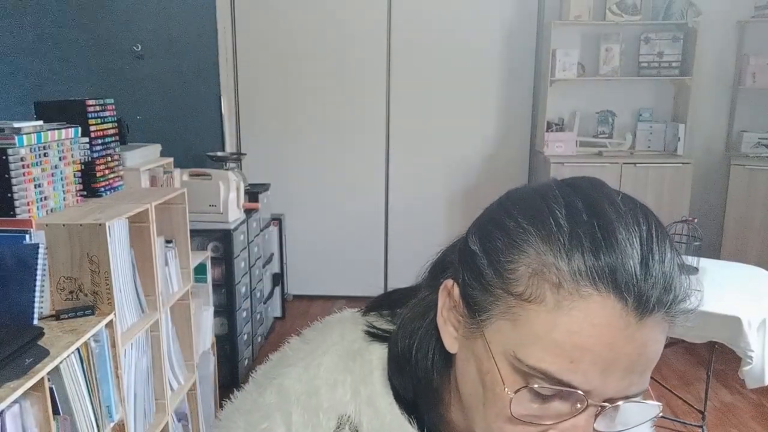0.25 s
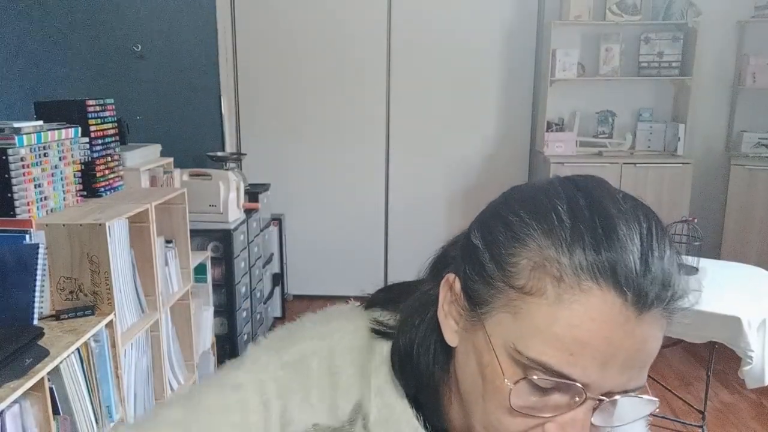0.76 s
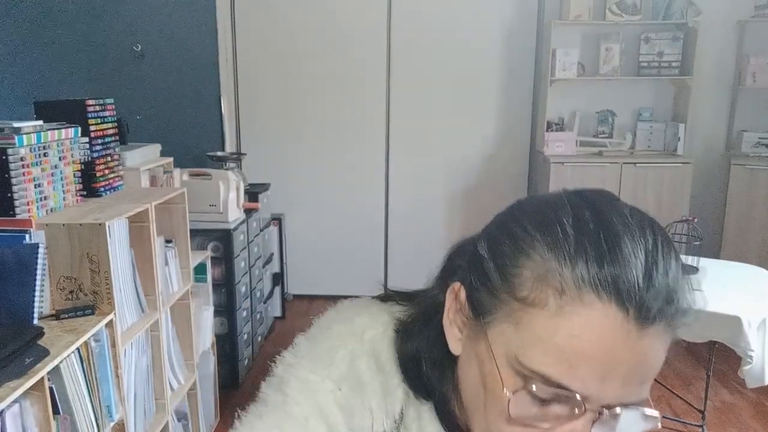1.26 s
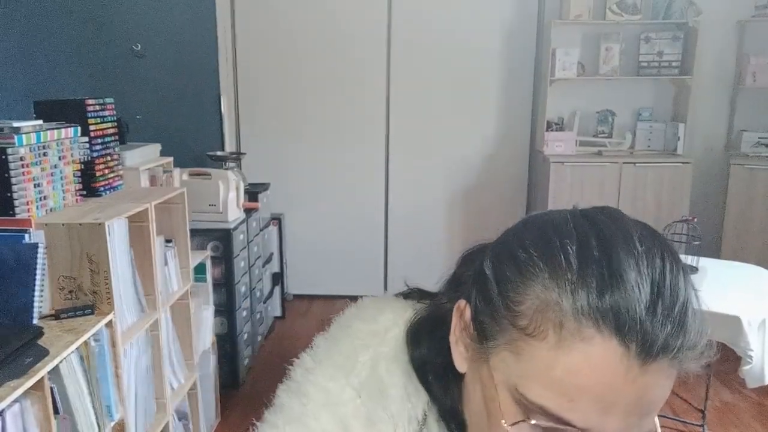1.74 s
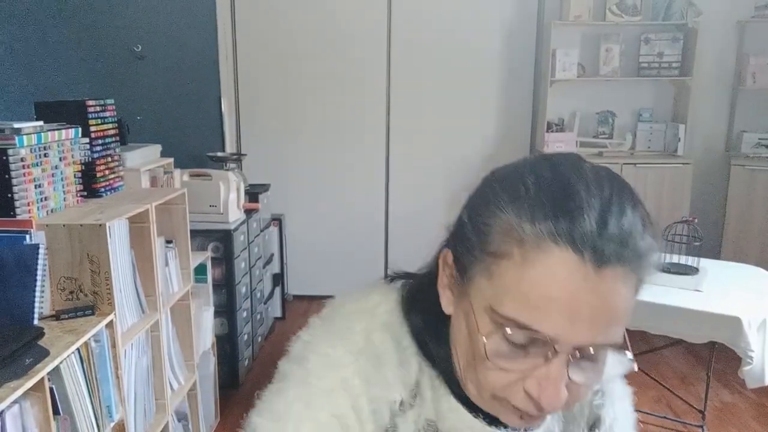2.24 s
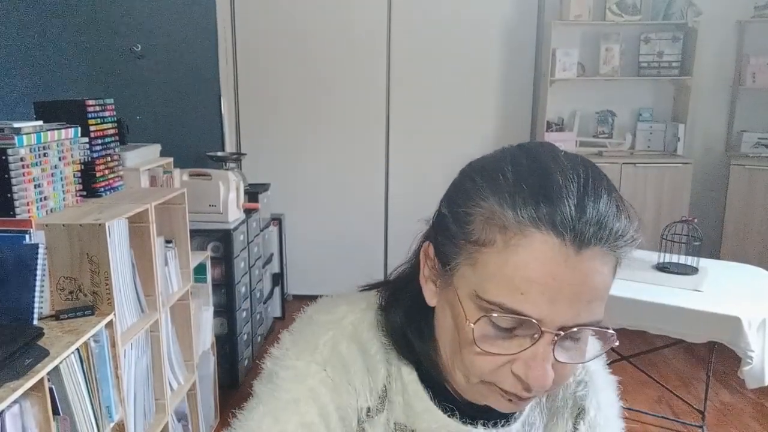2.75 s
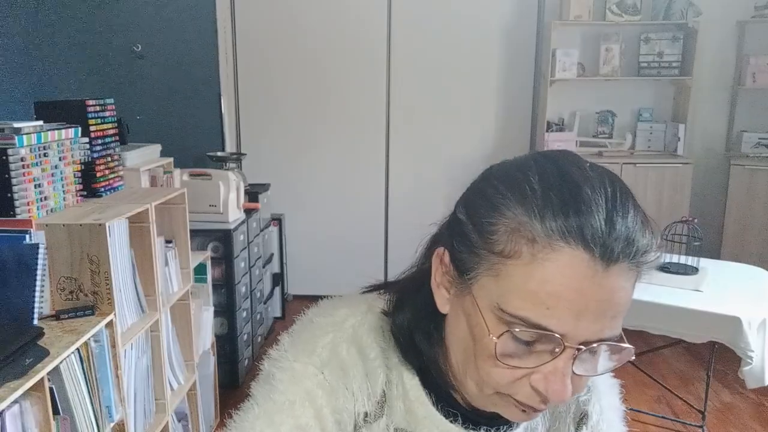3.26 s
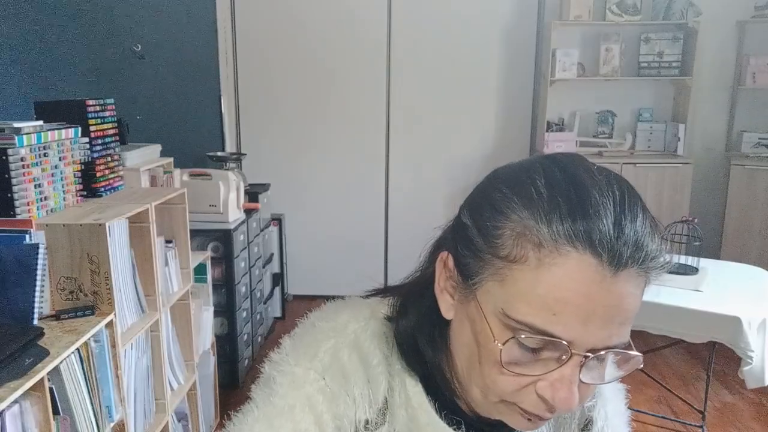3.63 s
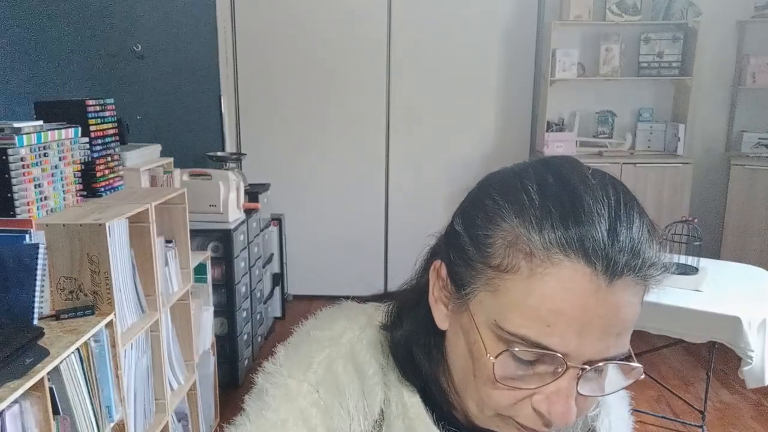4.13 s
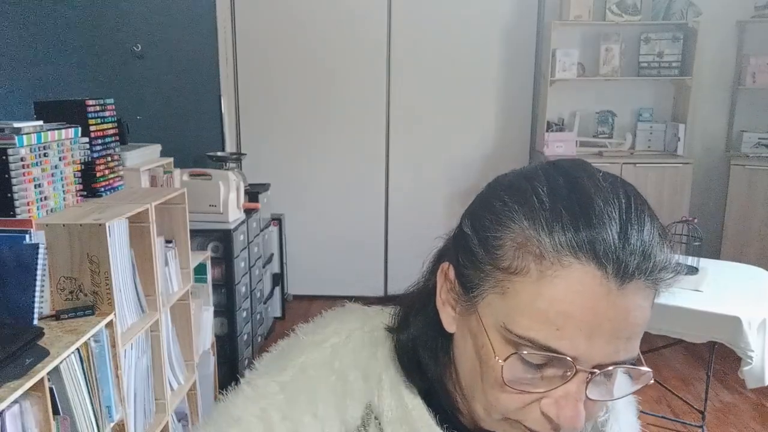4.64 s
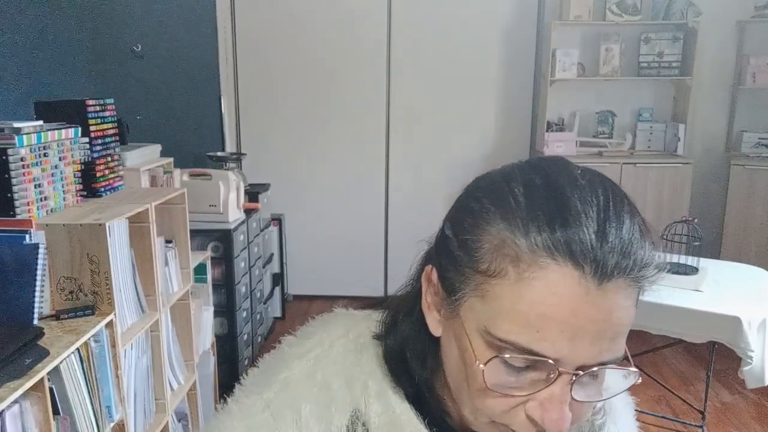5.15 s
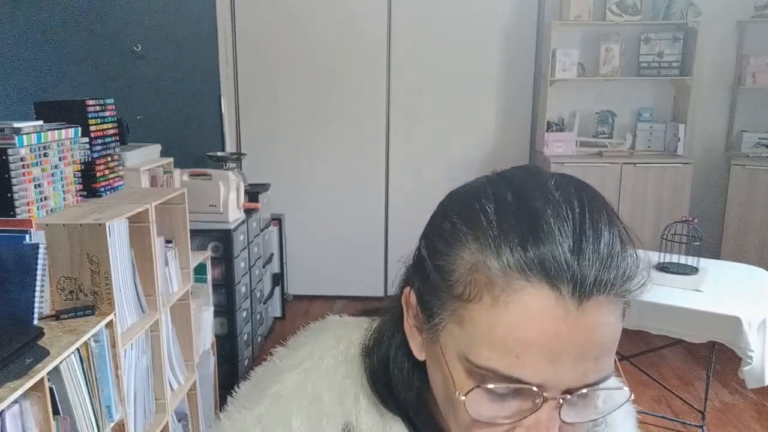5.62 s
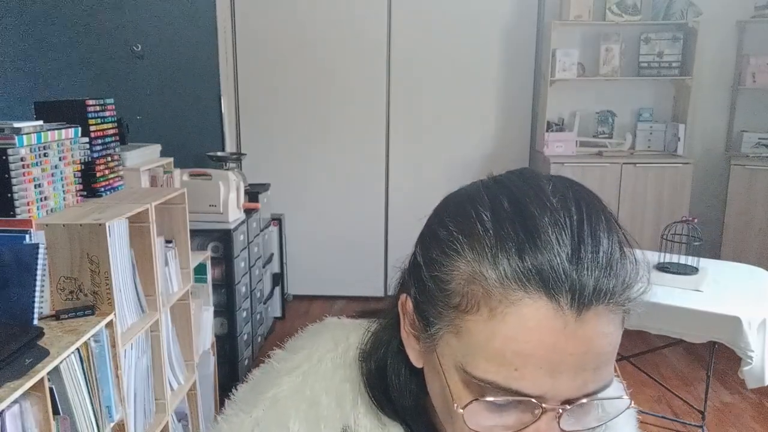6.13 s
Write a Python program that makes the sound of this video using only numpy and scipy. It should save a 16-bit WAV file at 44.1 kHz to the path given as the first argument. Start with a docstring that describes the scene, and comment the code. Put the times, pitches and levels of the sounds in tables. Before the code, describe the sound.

A low, soft room rumble runs throughout, heard close from a table in a small room. From 0.15 to 0.55 s card slides faintly with a thin bright hiss, a tick and a low scrape. At 1.1 s a lever punch starts down with light clicks, quickening around 1.2-1.5 s; at 1.5 s the die snaps through with a sharp crack and slight high ring. A strong knock at 1.71 s leads to the loudest, woody clunk at 1.76 s, the table resonating briefly. Near 2.1-2.3 s come scrapes and small clicks, then at 2.37 s the lever springs back with a bright clack and short metallic ring. From 2.5 to 3.6 s card rustles, hollow scuffs and ticks, clearest at 3.0 and 3.3 s. The rest is sparse: faint papery rubs, tiny ticks, soft dull bumps at 4.65 and 5.7 s, and last slides past 6 s.

```python
"""Over a low room rumble, card slides, ticks and hisses along a guide while a lever punch is dragged on a table.
From 1.1 s the lever is pushed down in steps; the die snaps through at 1.5 s and the hardest blow lands at 1.76 s.
At 2.37 s the spring throws the lever back; then come scuffs, card slides, ticks and, from 4.6 s, dull bumps.
Blows sum table modes, housing modes and coloured crunches; rubs are gated noise; the small room is decaying noise.
Two microphones on the table hear it all."""
import sys
import numpy as np
from scipy import signal
from scipy.fft import rfft, irfft
from scipy.io import wavfile
from scipy.ndimage import uniform_filter1d

SR = 44100
rng = np.random.default_rng(int(sys.argv[2]) if len(sys.argv) > 2 else 0)


def master(y):
    """Save y as 16-bit WAV."""
    cut = np.clip(np.atleast_2d(y).T, -1, 1)
    pcm = np.round(cut * 32767)  # scale
    wavfile.write(sys.argv[1], SR, pcm.astype(np.int16))


N = 281358
TIME = np.arange(N) / SR
BURST = np.arange(int(.8 * SR)) / SR  # time axis of one short event, s

# Knocks and blows of the punch. Each row: start in seconds, table thump in dB, housing clack in dB,
# blade crack in dB, contact fade in seconds, favoured housing pitch in Hz.
BLOWS = [(0.523, -58, -82, -80, 0.0053, 2050), (1.096, -53, -78, -78.5, .004, 1120),
         (1.115, -53, -79, -71.5, 0.0092, 1680), (1.22, -60, -54.5, -58.5, 0.004, 1120),
         (1.237, -50.5, -65.5, -67.5, .004, 1680), (1.279, -49, -51, -60.5, 0.0059, 1250),
         (1.332, -54.5, -64, -58.5, 0.012, 2050), (1.433, -59, -69, -60, 0.011, 1680),
         (1.485, -55, -69, -54.5, 0.024, 2050), (1.504, -33.5, -43, -40.5, 0.0038, 4800),
         (1.673, -58, -75.5, -55.5, 0.0086, 4800), (1.7141, -36, -44, -43, 0.0082, 2050),
         (1.758, -26, -30.5, -28, 0.0044, 1500), (1.769, -46.5, -43.5, -42.5, 0.0017, 2050),
         (2.234, -50, -67, -64.5, 0.0062, 1680), (2.264, -50.5, -59.5, -71, 0.0016, 1680),
         (2.286, -45.5, -62, -53, 0.022, 2050), (2.339, -47, -52.5, -55, 0.0041, 3150),
         (2.369, -43, -53, -41, 0.0016, 1120), (2.373, -33, -36.5, -36, 0.0023, 1680)]


def undb(db):
    """Decibels to gain."""
    return 10 ** (np.asarray(db) / 20)


def on_log_axis(hz, points):
    """Read (Hz, value) points along log frequency."""
    at, value = np.transpose(points)
    return np.interp(np.log(hz + 1), np.log(at), value)


def convolve(x, response):
    """Pass a sound through a response, keeping its length."""
    size = x.shape[-1]
    return signal.fftconvolve(np.atleast_2d(x), np.atleast_2d(response)[:, :size], axes=1)[:, :size]


def colour(x, points, size=8192):
    """Minimum-phase filter with the given spectrum, by folding the cepstrum."""
    gain = undb(on_log_axis(np.fft.rfftfreq(size, 1 / SR), points))
    cepstrum = irfft(np.log(gain))
    cepstrum[1:size // 2] *= 2
    cepstrum[size // 2 + 1:] = 0
    return convolve(x, irfft(np.exp(rfft(cepstrum))))


def steady(x):
    """Scale to rms 1."""
    return x / np.sqrt(np.mean(x ** 2))


def blow(x):
    """Scale to the energy of 10 ms at rms 1."""
    energy = np.mean(np.sum(x ** 2, axis=-1))
    return x / np.sqrt(energy / (SR / 100))


def add(out, s, sound):
    """Mix a sound in at a time."""
    start = int(s * SR)
    out[:, start:start + sound.shape[-1]] += sound[..., :N - start]


def pair_noise(size, spacing_m, match=0.81):
    """Noise from all around at two spaced microphones: most alike in the bass, unrelated in the treble."""
    alike = match * np.sinc(2 * np.fft.rfftfreq(size, 1 / SR) * spacing_m / 343)  # 343 m/s: sound in air
    mid = irfft(rfft(rng.standard_normal(size)) * np.sqrt(1 + alike), size)
    side = irfft(rfft(rng.standard_normal(size)) * np.sqrt(1 - alike), size)
    return np.array([mid + side, mid - side]) / np.sqrt(2)


def ring(modes, size=None):
    """Impulse response of damped modes given as (Hz, dB, t60 s)."""
    t = BURST[:size]
    return sum(undb(db - 60 * t / t60) * np.sin(2 * np.pi * hz * t) for hz, db, t60 in modes)


def contact(fade_s, spacing_m, size=2048):
    """A brief crunch of tiny contacts with an even spectrum: it starts at once and dies away."""
    fade = np.exp(-BURST[:size] / max(fade_s, 1e-4))
    crunch = rfft(pair_noise(size, spacing_m) * fade)
    power = uniform_filter1d(np.mean(abs(crunch) ** 2, axis=0), size=20)
    even = irfft(crunch / np.sqrt(power))
    return even * fade ** .1  # tames the late residue of the flattening


def friction(spectrum, grip_db, slips_per_s):
    """Rubbing noise that swells and sinks as the surfaces grip and slip."""
    grip = np.interp(TIME * slips_per_s, np.arange(N), rng.standard_normal(N))
    rub = pair_noise(N, spacing_m=0.082) * undb(grip_db * grip)
    return steady(colour(rub, spectrum))


def swells(rows):
    """Gain over time from (s, dB, half length s) bell-shaped strokes."""
    return sum(undb(db) * np.exp(-((TIME - s) / half_s) ** 2 / 2) for s, db, half_s in rows)


def strokes(rows, attack_s, swell_db, release_s):
    """Gain over time of hand strokes: each takes hold, swells while it lasts and dies away."""
    gain = np.zeros(N)
    for start_s, length_s, db in rows:
        age = TIME - start_s
        attack = np.clip(age / attack_s, 0, 1)
        hold = undb(db + swell_db * (np.clip(age / length_s, 0, 1) - 1))
        release = np.exp(-np.maximum(age - length_s, 0) / release_s)
        gain += attack * hold * release
    return gain


def room_rumble(level_db):
    """Steady low noise from all around the room."""
    # Each row: frequency in Hz, level in dB per Hz.
    rumble_spectrum = [(20, -9), (40, -5), (70, -12), (115, 0.5), (190, -5), (300, -9.5), (480, -19.5),
                       (800, -24.5), (1500, -29), (3000, -32), (8000, -38), (16000, -32.5)]
    return undb(level_db) * steady(colour(pair_noise(N, spacing_m=0.25), rumble_spectrum))


def room(x, build_s=.005):
    """Dense reflections of the first channel build up in milliseconds; each octave dies at its own rate."""
    # Decay of the room. Each row: frequency in Hz, t60 in seconds.
    room_decay = [(100, 0.46), (400, 0.7), (1500, 0.3), (5000, 0.51), (9000, 0.29), (15000, 0.4)]
    field = rfft(pair_noise(len(BURST), spacing_m=0.14))
    octave = np.log2(np.clip(np.fft.rfftfreq(len(BURST), 1 / SR), 125, 16000) / 125)
    tail = 0
    for k in range(8):  # overlapping octaves, 125 Hz to 16 kHz
        band = irfft(field * np.maximum(1 - abs(octave - k), 0), len(BURST))
        t60_s = on_log_axis(125 * 2 ** k, room_decay)
        tail = tail + band * undb(-60 * BURST / t60_s)
    tail = tail * (1 - np.exp(-(BURST / build_s) ** 2))
    return convolve(x[0], tail / np.sqrt(np.sum(tail ** 2) / 2))


def bumps(direct_db=-5, room_db=-1, attack_s=0.0035, fade_s=0.021):
    """Padded contacts that rise softly and leave a short wash in the room."""
    # Each row: start in seconds, level in dB.
    bump_rows = [(4.646, -60.5), (4.666, -64), (5.712, -62), (5.789, -69.5)]
    # Each row: frequency in Hz, level in dB per Hz.
    bump_spectrum = [(100, -5), (300, 7), (550, 0), (900, 0), (1600, 2.5), (2600, -3.5), (3500, -12.5),
                     (6000, -18), (16000, -47)]
    gain = np.zeros(N)
    for s, db in bump_rows:
        age = np.maximum(TIME - s, 0)
        gain += undb(db) * np.minimum(age / attack_s, 1) * np.exp(-age / fade_s)
    thud = gain * friction(bump_spectrum, grip_db=2, slips_per_s=120)
    return undb(direct_db) * thud + undb(room_db) * room(thud)


def card(face_db=-2):
    """The card's face rubs with a papery rustle; its cut edge adds a thin hiss."""
    # Pushes along the guide. Each row: start in seconds, length in seconds, level in dB.
    slides = [(.145, 0.021, -71.5), (.275, 0.19, -70.5), (.42, 0.086, -71.5), (1.165, .03, -67),
              (1.22, 0.31, -68), (1.52, 0.11, -69), (1.63, 0.049, -57), (2.27, 0.062, -53),
              (2.5, 0.097, -63), (2.615, 0.089, -60.5), (2.72, 0.15, -62), (3.13, .17, -68.5),
              (3.3, 0.07, -56.5), (3.42, 0.19, -72.5), (4.075, .04, -69), (4.14, .15, -76.5),
              (4.52, 0.14, -73), (4.865, 0.084, -71), (5.03, 0.16, -75), (5.265, 0.063, -71),
              (5.385, 0.23, -67), (5.68, .23, -74), (5.97, .11, -72.5), (6.09, 0.059, -65),
              (6.24, 0.065, -72)]
    # The cut edge skims the guide. Each row: centre in seconds, level in dB, half length in seconds.
    skims = [(.315, -63, 0.031), (.41, -60, 0.032), (.465, -64.5, 0.042), (.515, -69, 0.018),
             (4.855, -64.5, 0.015), (5.065, -65.5, 0.023), (5.15, -66.5, 0.016), (5.29, -67.5, .016)]
    # Spectra of face and edge. Each row: frequency in Hz, level in dB per Hz.
    face_spectrum = [(200, -17.5), (700, -9), (1300, -6.5), (1900, 1.5), (2300, 5), (2900, -2.5),
                     (4200, -3.5), (6500, -5.5), (9000, -3.5), (12000, -1.5), (16000, -7.5)]
    edge_spectrum = [(200, -36), (2000, -14), (4000, -8.5), (7500, -12), (9500, -7.5), (11000, -3.5),
                     (12500, 0), (16000, -11)]
    push = strokes(slides, attack_s=0.012, swell_db=2, release_s=0.014)
    face = push * friction(face_spectrum, grip_db=2, slips_per_s=400)
    edge = swells(skims) * friction(edge_spectrum, grip_db=4, slips_per_s=750)
    return undb(face_db) * face + edge


def ticks():
    """The card's edge catches and flicks free with one short resonance."""
    # Each row: start in seconds, level in dB, ring in Hz, ring width in Hz, contact fade in seconds.
    tick_rows = [(.427, -61.5, 8920, 7000, 0.0027), (0.515, -62.5, 2230, 110, 0.0065),
                 (2.9904, -53.5, 3400, 930, 0.0011), (3.004, -56.5, 2000, 1500, 0.0051),
                 (3.493, -70.5, 1740, 500, 0.0054), (3.582, -74.5, 6000, 8000, 0.0058),
                 (4.096, -71, 3600, 895, 0.00061), (4.102, -65, 1470, 497, 0.007),
                 (4.193, -71, 1420, 594, 0.0025), (4.278, -72.5, 1447, 694, 0.0029),
                 (4.825, -62.5, 6030, 1800, 0.0011)]
    out = np.zeros((2, N))
    for s, db, hz, width_hz, fade_s in tick_rows:
        b, a = signal.iirpeak(hz, hz / width_hz, fs=SR)
        flick = signal.lfilter(b, a, contact(fade_s, spacing_m=0.0257))
        add(out, s, undb(db) * blow(flick))
    return out


def drags():
    """The punch drags on the table under the hand: low scraping noise."""
    # Each row: start in seconds, length in seconds, level in dB.
    drag_rows = [(.28, 0.046, -66), (.41, 0.057, -63), (.505, 0.044, -63), (1.09, 0.037, -58.5),
                 (1.19, 0.16, -56), (1.38, .32, -61.5), (2.05, 0.077, -57.5), (2.24, .22, -51),
                 (2.62, .09, -59.5), (2.95, 0.054, -59.5), (3.04, 0.31, -67), (3.35, 0.051, -60.5)]
    # Each row: frequency in Hz, level in dB per Hz.
    scrape_spectrum = [(30, -18), (70, -11.5), (110, 2.5), (250, -3), (400, -11), (650, -20), (950, -21),
                       (1500, -27.5), (4000, -39), (16000, -56.5)]
    pull = strokes(drag_rows, attack_s=0.022, swell_db=1, release_s=0.029)
    return pull * friction(scrape_spectrum, grip_db=3.5, slips_per_s=69)


def scuffs():
    """Short hollow rubs of the punch's base over the mat."""
    # Each row: centre in seconds, level in dB, half length in seconds.
    scuff_rows = [(2.092, -60.5, 0.02), (2.201, -64.5, 0.029), (2.64, -66, 0.02), (2.828, -58.5, 0.038),
                  (2.969, -63, 0.023), (3.093, -69.5, 0.037)]
    # Each row: frequency in Hz, level in dB per Hz.
    scuff_spectrum = [(100, -13.5), (250, 6), (450, 0.5), (650, -8), (950, -4.5), (1350, -19), (4000, -28),
                      (16000, -34)]
    return swells(scuff_rows) * friction(scuff_spectrum, grip_db=1.5, slips_per_s=83)


def steel(room_db=-6):
    """The die rings as it meets the card, the return spring as it throws the lever back."""
    # Each row: frequency in Hz, level in dB, t60 in seconds.
    die_modes = [(4586, 0.5, .25), (4829, 2, 0.11)]
    spring_modes = [(1744, -5.5, .4), (1770, 3.5, .38), (2315, -6.5, 0.28)]
    out = np.zeros((1, N))
    add(out, 1.504, undb(-53.5) * blow(ring(die_modes)))
    add(out, 2.373, undb(-43.5) * blow(ring(spring_modes)))
    return out + undb(room_db) * room(out)


def thumps(push_s=0.0018, dent_hz=185, dent_t60_s=0.0097, lag_s=0.00022, cushion=0.38, firm_db=-30):
    """The table top gives way under each blow, then rings on in its modes; returns (dents, ringing)."""
    # Modes of the table top. Each row: frequency in Hz, level in dB, t60 in seconds.
    table_modes = [(104.35, -6.5, 0.52), (135, -17, 0.1), (171.3, -12.5, 0.25), (216, -16.5, 0.1),
                   (244.9, -4.5, .12), (333.5, -4.5, 0.13), (481, -16, 0.34), (595, -10.5, .1),
                   (680, -9, 0.21)]
    dents = np.zeros((1, N))
    ringing = np.zeros((2, N))
    push = np.sin(np.pi * np.minimum(BURST / push_s, 1))
    dent = -blow(convolve(push, ring([(dent_hz, 0, dent_t60_s)])))
    top = -blow(convolve(push, ring(table_modes)))[0]
    # the ringing reaches the left microphone first
    top = np.array([top, np.interp(BURST - lag_s, BURST, top)])
    for s, thump_db, *_ in BLOWS:
        # the punch's feet cushion the first jolt of light blows; blows above firm_db dent harder
        add(dents, s, undb(thump_db + cushion * (thump_db - firm_db)) * dent)
        add(ringing, s, undb(thump_db) * top)
    return dents, ringing


def punch(favour_db=7, favour_octaves=0.13):
    """Each blow rings the housing and cracks at the blade, as radiated in one direction."""
    # Modes of the plastic housing. Each row: frequency in Hz, level in dB, t60 in seconds.
    housing_modes = [(1144, -6, .03), (1470, -5.5, 0.0046), (1737, 2, 0.014), (2020, 3.5, 0.011),
                     (3280, -2.5, 0.007), (4620, -3, 0.0071)]
    # Blade crack. Each row: frequency in Hz, level in dB per Hz.
    crack_spectrum = [(150, -11), (500, 2), (650, 3), (820, -1), (1400, 5), (2500, 5), (5000, 2.5),
                      (8000, 5), (16000, 0.5)]
    out = np.zeros((2, N))
    hz, db, t60_s = np.transpose(housing_modes)
    for s, _, clack_db, crack_db, fade_s, favoured_hz in BLOWS:
        # the place of contact decides which modes speak most
        favour = favour_db * np.exp(-(np.log2(hz / favoured_hz) / favour_octaves) ** 2)
        housing = ring(zip(hz, db + favour, t60_s), size=2048)
        clack = convolve(contact(fade_s, spacing_m=0.0064), housing)
        crack = colour(contact(fade_s, spacing_m=0.024), crack_spectrum, size=1024)
        add(out, s, undb(clack_db) * blow(clack))
        add(out, s, undb(crack_db) * blow(crack))
    return out


def punch_echo(count=3):
    """The punch sends different clatters towards the walls: independent crunches, each with its own tail."""
    return sum(room(punch()) for _ in range(count)) / np.sqrt(count)


def scene(dent_db=-5, thump_room_db=-3, clatter_room_db=-2, tick_room_db=-10, card_room_db=-4,
          drag_db=-1, bump_db=4, rumble_db=-66):
    """Punch, card and table in the room, over its rumble."""
    dents, ringing = thumps()
    flicks = ticks()
    rustle = card()
    sent = undb(thump_room_db) * dents + undb(tick_room_db) * flicks + undb(card_room_db) * rustle
    echo = room(sent) + undb(clatter_room_db) * punch_echo()
    background = room_rumble(rumble_db) + echo + undb(bump_db) * bumps()
    rubs = rustle + flicks + undb(drag_db) * drags() + scuffs()
    blows = steel() + undb(dent_db) * dents + ringing + punch()
    return background + rubs + blows


def record(dry, top_hz=15900):
    """The microphones lose deep bass, their ports lift the treble near 10 kHz, and the top is cut."""
    # Microphone response. Each row: frequency in Hz, gain in dB.
    microphone_response = [(20, -35.5), (35, -19), (55, -4.5), (90, 2), (6500, 2), (8000, 4), (9500, 7),
                           (10800, 3), (12000, -4.5), (14000, -6), (16000, -8.5)]
    top_cut = signal.ellip(10, .2, 70, top_hz, fs=SR, output="sos")
    return signal.sosfilt(top_cut, colour(dry, microphone_response))


dry = scene()
out = record(dry)
master(out)
```